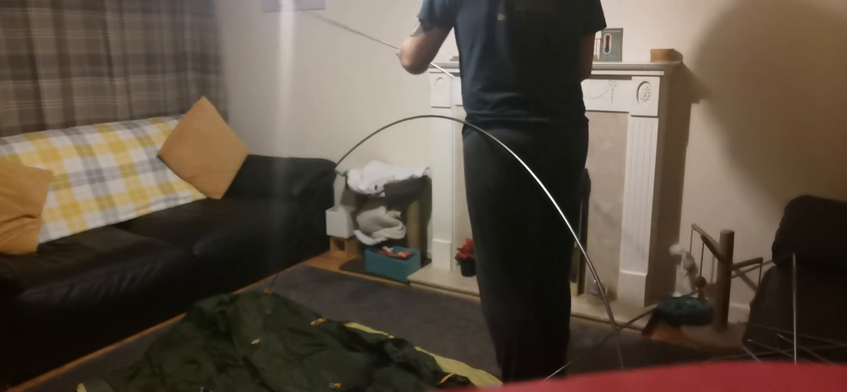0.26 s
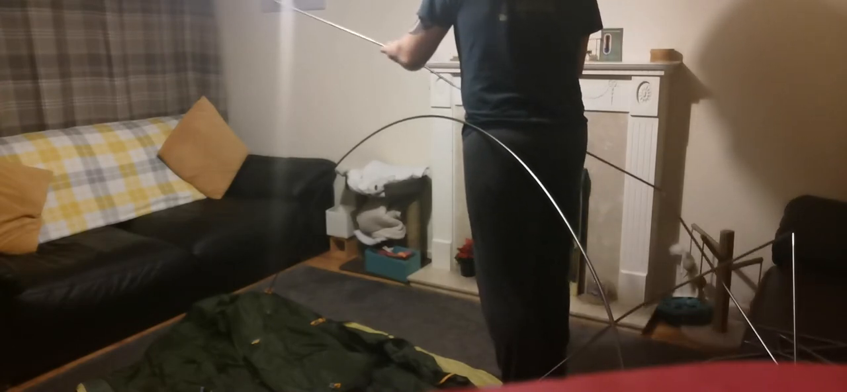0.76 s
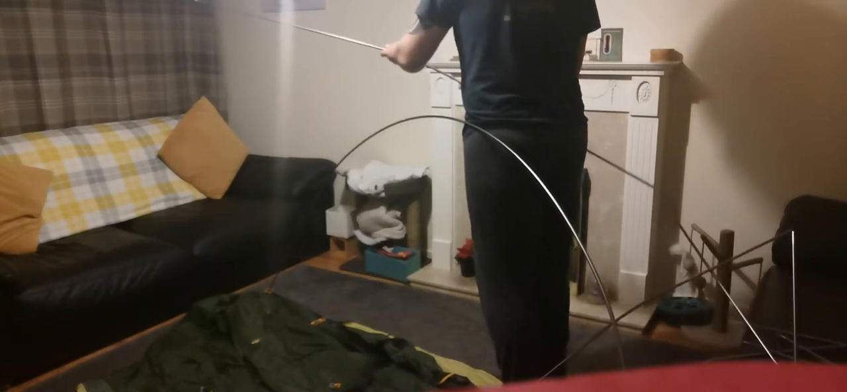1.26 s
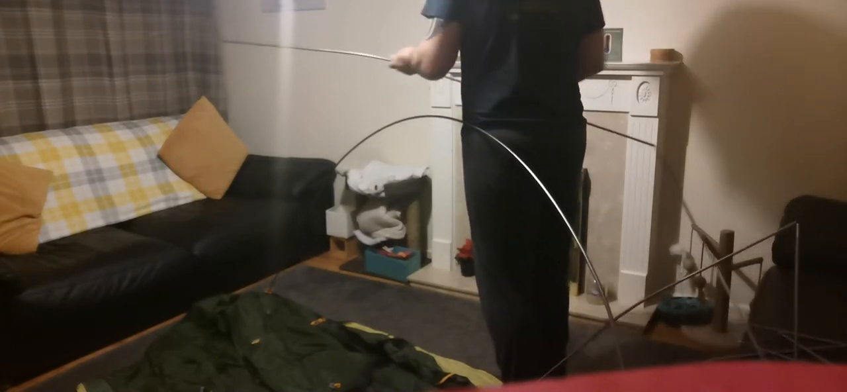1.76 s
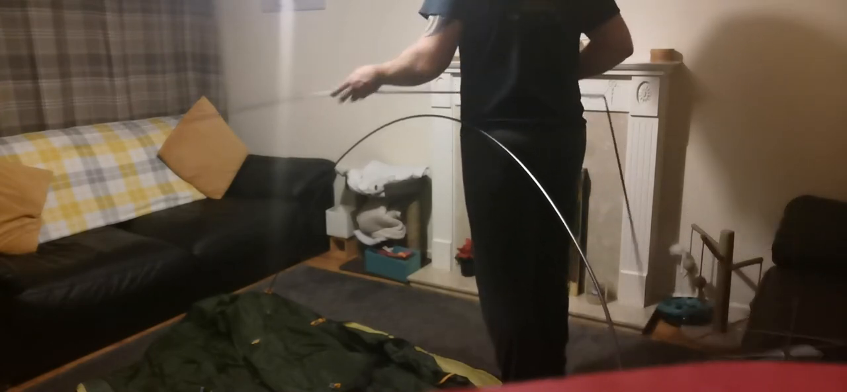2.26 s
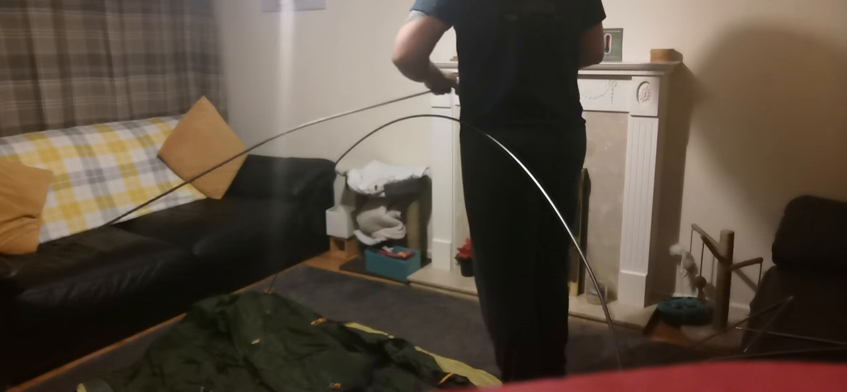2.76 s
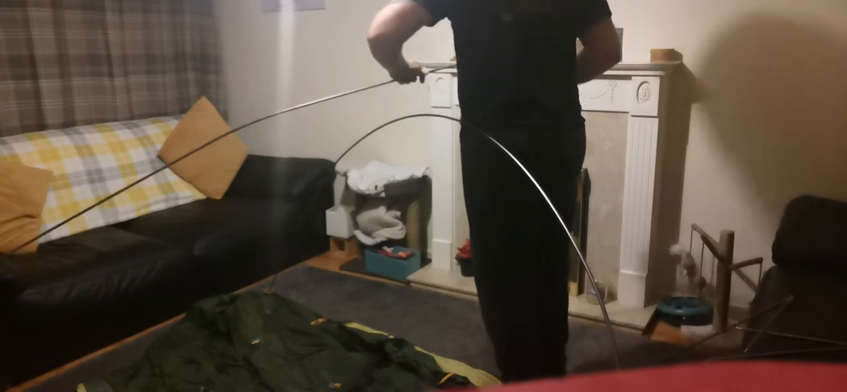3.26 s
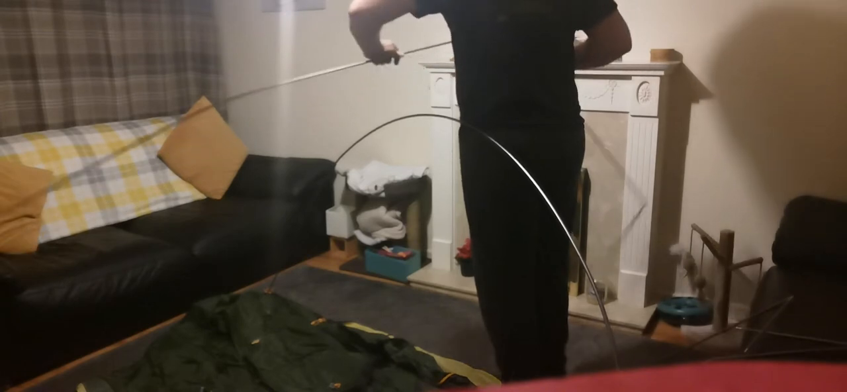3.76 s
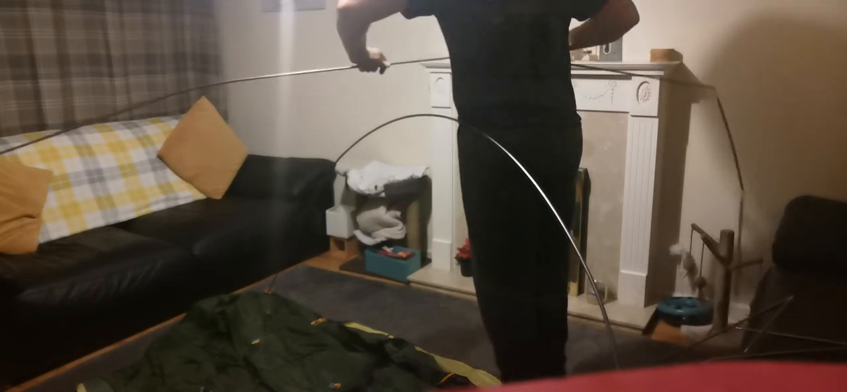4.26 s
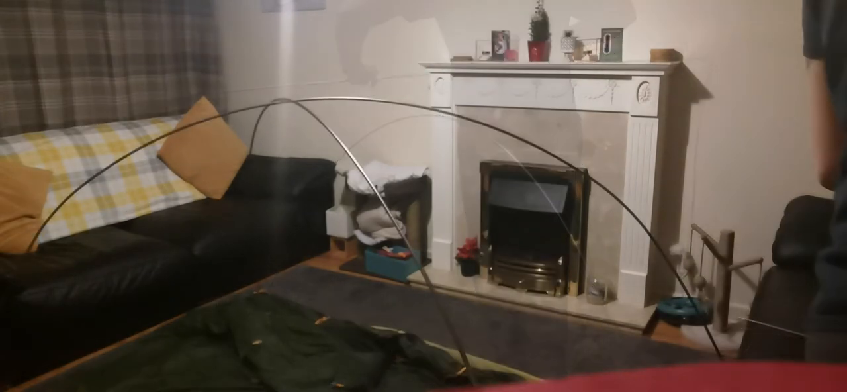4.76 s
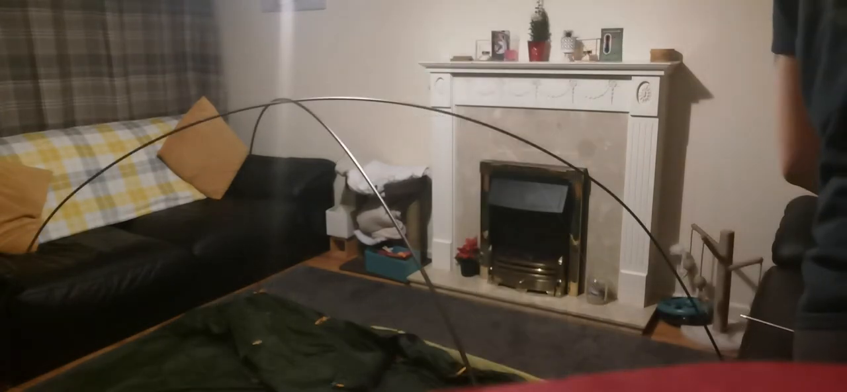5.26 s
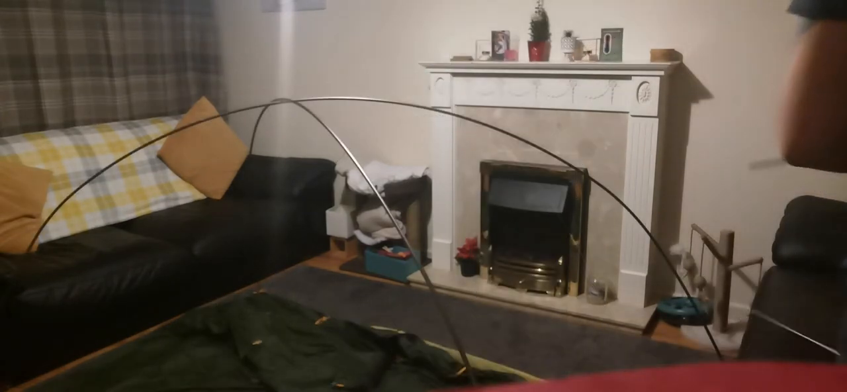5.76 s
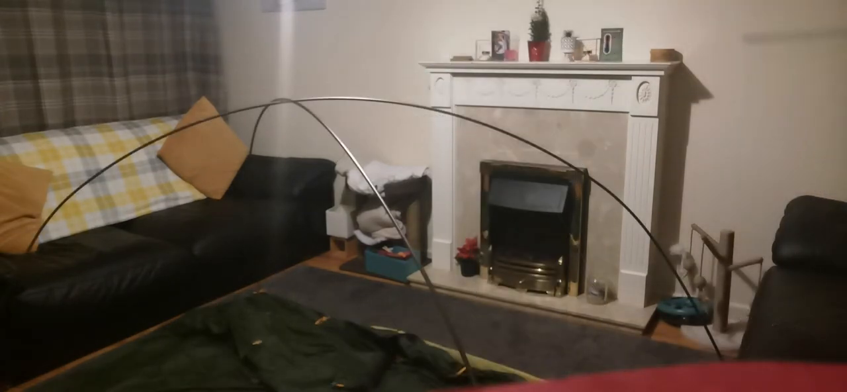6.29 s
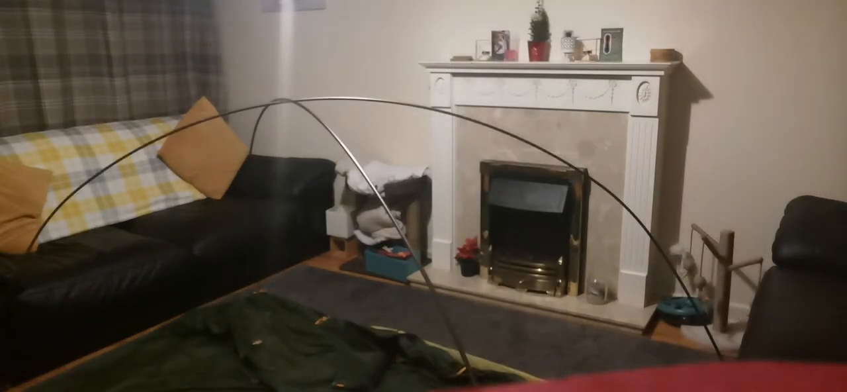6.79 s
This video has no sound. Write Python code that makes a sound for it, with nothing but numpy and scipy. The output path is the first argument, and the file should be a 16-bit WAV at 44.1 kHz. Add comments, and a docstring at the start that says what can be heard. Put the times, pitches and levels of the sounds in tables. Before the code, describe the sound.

In a small living room, thin metal tent pole sections scrape, click and snap together, clattering most densely around two seconds, then near quiet.

```python
"""A small living room: someone unfolds a metal tent pole about two metres from the microphone.
Sections slide in grains of tiny slips and snap home, pulled by the elastic cord, as dispersed cracks with
noise bodies and ringing tube modes; the loose end swings down, scrapes and clatters. Sleeves rustle as
fluttering noise, a foot lands on the carpet as soft noise thuds with a floor boom, and the bare walls
ring briefly as decaying noise. Floor rumble and a faint hiss lie beneath."""
import sys
import numpy as np
from scipy import signal
from scipy.fft import rfft, irfft, next_fast_len
from scipy.io import wavfile
from scipy.ndimage import uniform_filter1d

SR = 44100
rng = np.random.default_rng(int(sys.argv[2]) if len(sys.argv) > 2 else 0)


def int16_out(signal):
    """Quantize to a 16-bit WAV file."""
    q = np.round(np.clip(np.atleast_2d(signal).T, -1, 1) * 32767)
    wavfile.write(sys.argv[1], SR, q.astype(np.int16))


N = 310023
TIME = np.arange(N) / SR

# Colour of the room hiss: (frequency [Hz], level [dB])
HISS_COLOUR = [(25, 18), (70, 14.5), (140, 8.5), (300, 7), (500, 2), (1000, -1.5), (2000, -10.5),
               (4800, -8.5), (7000, -15.5), (9500, -27.5), (13000, -16), (15800, -25)]
# Colour of the floor rumble: (frequency [Hz], level [dB])
RUMBLE_COLOUR = [(10, -7.5), (22, -2.5), (58, -1.5), (110, -9.5), (250, -17), (600, -42), (3000, -66.5)]
# How much the person moves, most while swinging the pole round; drives cloth and rumble:
# (time [s], level [dB])
MOTION = [(0, -4.5), (1.2, -7.5), (2.2, 0.5), (3.1, -5), (4.1, -4), (4.7, -17), (6.0, -11)]
# Colour of rubbing cloth: (frequency [Hz], level [dB])
CLOTH_COLOUR = [(60, 5.5), (250, 1), (600, -2.5), (1200, -5), (3000, -7.5), (6000, -8.5), (10000, -20.5),
                (15800, -27)]
# A sleeve or trouser leg brushing as the person steps aside:
# (time [s], length [s], level [dB], growth from start to end [dB])
BRUSHES = [(5.074, 0.081, -66.5, -6), (5.277, 0.033, -54, 3), (5.552, 0.11, -73.5, 3),
           (6.908, 0.056, -64, -1)]
# Decay of the room: (frequency [Hz], time to fall 60 dB [s])
ROOM_DECAY = [(150, 0.28), (500, 0.4), (1200, 0.39), (3000, 0.34), (7000, 0.32), (13000, 0.29)]
# Pole sliding along pole or through the hand:
# (time [s], length [s], level [dB], growth from start to end [dB], grit [0-1])
STROKES = [(0.005, 0.014, -71, -15, 0.2), (0.154, 0.14, -42.5, 3, 0.2), (0.348, 0.11, -43.5, 0.5, 0.49),
           (0.52, 0.023, -57, -5, 0.55), (1.037, 0.026, -62.5, -1, 0), (1.184, 0.068, -62, 1.5, 0.7),
           (1.332, 0.055, -46.5, 15, 0.5), (1.628, 0.067, -53, -2.5, 0.67), (1.737, 0.14, -65, 21.5, 0.6),
           (1.932, 0.15, -48, 4.5, 0.36), (2.224, 0.12, -35.5, 1.5, 0.7), (2.423, .11, -42.5, 3, 0.6),
           (2.606, 0.025, -38, -10, .1), (2.786, 0.073, -71, 9, 0.3), (3.289, .03, -57, -7, 0.26),
           (3.77, 0.25, -64, 7.5, 0.4), (3.997, 0.043, -45.5, -2, 0.9), (4.061, 0.063, -46.5, 10.5, 0.87),
           (4.257, 0.011, -58, -2, 0.4), (4.531, 0.022, -72.5, -6.5, 0.6), (4.703, 0.011, -59.5, 2, 0.26),
           (5.313, .012, -55, -7, 0.5), (5.55, 0.12, -76.5, -13.5, 0.07)]
# Colour of firm scraping: (frequency [Hz], level [dB])
SCRAPE_COLOUR = [(100, -14), (300, -12), (600, -15.5), (950, -14.5), (1600, -14.5), (2300, -7), (3200, -3),
                 (4600, 4), (6000, -1.5), (7100, 0), (9500, -14), (11000, -15), (13000, -13.5),
                 (15800, -28.5)]
# Colour of light rubbing on top of the scrape colour: (frequency [Hz], level [dB])
GENTLE_COLOUR = [(1500, 11.5), (2400, 1.5), (2950, 9.5), (3500, 1.5), (4900, -2.5), (6500, -3), (11000, -6)]
# Nominal modes of the tubes: (frequency [Hz], level [dB], time to fall 60 dB [s])
TUBE_MODES = [(195, -13, 0.096), (468, -7, 0.25), (862, -3, 0.11), (936, -15, 0.058), (1248, -7.5, 0.08),
              (1660, -11, 0.1), (2250, -9, 0.0427), (3180, -19, 0.074), (3475, -0.5, 0.061),
              (4033, -0.5, 0.024), (4730, 13.5, 0.0099), (5080, -6.5, 0.035), (6550, 5.5, 0.17),
              (6740, -3.5, 0.055), (7710, -11, 0.062), (8500, -6.5, .04), (10560, 4, 0.034),
              (11900, -6.5, .04), (12700, -8, 0.047)]
# Joints snapping home and sections knocking together; the free length of pole sets the bending pitch:
# (time [s], level [dB], body [dB], hollow tone at 2 kHz [dB], treble at 12 kHz [dB],
#  bending mode [Hz], direct sound [dB], left minus right [dB])
SNAPS = [(0.159, -14, -14.5, -15, -8, 900, -7.5, 14), (0.291, -12, -21, -2, -13, 940, -2, 8.5),
         (0.369, -22.5, -1.5, 7, -17, 960, -8, 3.5), (1.386, -1.5, -18, 1, -5, 1225, -2, 0),
         (1.769, -20.5, -13, -1, -15, 950, 0, 0.5), (1.933, -13, -15, -7.5, -19.5, 980, -4, -2.5),
         (2.121, -0.5, -8, -3.5, -2.5, 1011, -4, -1), (2.2, -3, -6, -3, -5.5, 924, -3.5, 1),
         (2.224, -3, -14.5, -5.5, -5, 688, -3, -2.5), (2.245, -8, -5, -5.5, 4.5, 827, -8, 0.5),
         (2.292, -8.5, -4.5, -1.5, 8.5, 393, -3, -1), (2.338, 3, -14, -1, 0, 475, -2.5, 0),
         (2.348, -12, -5, 3.5, -2.5, 876, 2, 1.5), (2.358, -6, -6.5, -0.5, 6.5, 701, 0.5, -2),
         (2.463, -5.5, -7, -12, -3, 890, -2, -2.5), (2.526, -4, -8, -8, -1, 457, -2.5, 0.5),
         (2.549, -10, -8, 6, -2, 750, -6.5, -4), (2.584, -2, -23, -4.5, -6, 980, -1, -1.5),
         (2.606, -1.5, -9.5, 1, -1.5, 537, -2.5, -2), (3.050, -19.5, -10.5, -0.5, -8, 455, -5.5, -2),
         (3.276, -20.5, -29, 1, -3, 920, -9, 9.5), (3.298, -2.5, -11.5, 8, -1.5, 468, -2, 0.5),
         (3.973, -5.5, -10.5, -5, -8, 924, -1.5, 0.5), (3.997, -19.5, -6, 7.5, 7, 179, -9, 3),
         (4.264, -13.5, -26, -17, -6.5, 934, 2.5, -0.5), (4.459, -31, -20, 1, 2.5, 920, -1, 1),
         (4.721, -6.5, -41, 5, -1, 960, 1, 0.5), (6.004, -4.5, -20, 5, -2.5, 248, -3.5, -0.5)]
# Colour of the sharp contact: (frequency [Hz], level [dB])
CRACK_COLOUR = [(400, -36), (1000, -15), (1800, -13.5), (2800, -1.5), (4200, 3.5), (5300, 4.5), (6100, 1),
                (7100, 7), (8300, -0.5), (9800, -7.5), (11000, -2.5), (13000, -7), (15800, -16)]
# Colour of the dull body under each crack: (frequency [Hz], level [dB])
BODY_COLOUR = [(80, -13), (140, -12), (210, 2), (330, -5.5), (560, -4.5), (850, -0.5), (1300, -5.5),
               (2200, -14.5), (5000, -25)]
# Dull bumps on the floor:
# (time [s], level [dB], swell time constant [s], decay time constant [s], upper edge [Hz], floor boom [dB])
BUMPS = [(2.208, -15, 0.011, 0.072, 306, -22), (2.341, -6, 0.0026, 0.024, 200, 4.5),
         (2.402, -10.5, 0.0039, 0.082, 151.4, -12), (2.561, -14.5, .01, 0.12, 357, -8),
         (6.891, -17, 0.021, 0.093, 447, -18), (6.938, -14.5, 0.0087, 0.035, 198, -5.5)]
# Colour of the two microphone ports: (frequency [Hz], level [dB])
LEFT_PORT = [(1200, -2.0), (4500, -2.6), (7000, -4.0), (9000, 2.8), (14000, 1.5)]
RIGHT_PORT = [(1200, -2.9), (4500, -1.4), (7000, 0.6), (9000, -1.0), (14000, -0.44)]

PLACES = 4  # radiating places along the pole
HISS_DB, RUMBLE_DB, CLOTH_DB = -71, -55.5, -63  # rumble and cloth: before the motion curve
STROKE_ATTACK_S, STROKE_RELEASE_S = 0.013, 0.023  # time constants
BRUSH_ATTACK_S, BRUSH_RELEASE_S = 0.04, 0.04  # time constants
BEND_DB = -10  # bending mode at 1 kHz, relative to the body
BEND_DB_PER_OCTAVE = -6.5  # a longer free length bends lower and more strongly
FLOOR_HZ, FLOOR_T60 = 63.6, 0.11  # boom of the floorboards; t60 in seconds
TOP_HZ = 15900


def undb(db):
    """Decibels to gain."""
    return 10 ** (np.asarray(db) / 20)


def unit(x):
    """Scale to an energy of one."""
    return x / np.sqrt(np.sum(x ** 2))


def level(x, db):
    """Scale to an rms level in dB."""
    return x * undb(db) / np.sqrt(np.mean(x ** 2))


def motion():
    """Level of the person's movement over time in dB, joined by straight lines."""
    s, db = np.transpose(MOTION)
    return np.interp(TIME, s, db)


def colour(x, points):
    """Minimum-phase filter with the given (frequency [Hz], level [dB]) outline."""
    size = 8192
    hz, db = np.transpose(points)
    log_hz = np.log(np.arange(size // 2 + 1) * SR / size + 1)
    gain = undb(np.interp(log_hz, np.log(hz), db))
    # Folding the cepstrum forward makes the response causal.
    cepstrum = irfft(np.log(gain))
    cepstrum[1:size // 2] *= 2
    cepstrum[size // 2 + 1:] = 0
    response = irfft(np.exp(rfft(cepstrum)))
    if x.ndim > 1:
        response = response[None]
    return signal.oaconvolve(x, response, axes=-1)[..., :x.shape[-1]]


def add(track, s, sound):
    """Mix a sound into a track from time s on."""
    i = int(s * SR)
    track[..., i:i + sound.shape[-1]] += sound[..., :N - i]


def walk(rate):
    """Smooth random wander with a spread near one; rate is in new values per second."""
    steps = rng.standard_normal(2048)
    return np.interp(TIME * rate, np.arange(len(steps)), steps)


def ports(size, alike_hz, most=1):
    """Diffuse noise at two microphone ports: most alike in the bass, unrelated in the treble."""
    mid, side = rfft(rng.standard_normal((2, size)))
    hz = np.arange(len(mid)) * SR / size
    alike = most / (1 + (hz / alike_hz) ** 2)
    shared = mid * np.sqrt(1 + alike)
    opposed = np.array([[1], [-1]]) * side * np.sqrt(1 - alike)
    return irfft(shared + opposed, size)


def hush():
    """The faint hiss of the room: diffuse noise that wavers very slightly."""
    air = ports(next_fast_len(N, real=True), 300)[:, :N]
    waver_db = 0.7 * walk(3.29)
    return level(colour(air, HISS_COLOUR), HISS_DB) * undb(waver_db)


def rumble(alike=0.31):
    """Low rumble of the floor as weight shifts: bass noise partly shared by the two ports."""
    noise = ports(next_fast_len(N, real=True), 130, alike)[:, :N]
    return level(colour(noise, RUMBLE_COLOUR), RUMBLE_DB) * undb(motion())


def stroke(s, length, db, growth_db, attack_s, release_s):
    """Gain of one rubbing movement: it sets in, holds while growing or easing, and dies away."""
    t = TIME - s
    held = np.clip(t, 0, length)
    edges = np.minimum(t, 0) / attack_s - np.maximum(t - length, 0) / release_s
    swell = undb(db + growth_db * (held / length - 0.5))
    return swell * np.exp(np.maximum(edges, -20))  # the floor keeps later logarithms finite


def rustle(flutter_db=3):
    """Cloth folds rub unevenly as the person moves, and louder in a few brushes."""
    brushes = sum(stroke(*row, BRUSH_ATTACK_S, BRUSH_RELEASE_S) for row in BRUSHES)
    gain = undb(CLOTH_DB + motion()) + brushes
    rubbing = rng.standard_normal(N) * undb(flutter_db * walk(70))
    return level(colour(rubbing, CLOTH_COLOUR), 0) * gain


def room(x, build_s=0.0028, alike_hz=240):
    """Diffuse ring of the room from one place: noise dying at its own speed in each band."""
    t = TIME[:SR // 2]
    noise = rfft(ports(len(t), alike_hz))
    band_hz, t60 = np.transpose(ROOM_DECAY)
    log_hz = np.log(np.linspace(1, SR / 2, noise.shape[-1]))
    tail = 0
    for share, decay in zip(np.eye(len(t60)), t60):
        band = irfft(noise * np.interp(log_hz, np.log(band_hz), share))
        tail = tail + band * np.exp(-np.log(1000) * t / decay)
    tail = tail * (1 - np.exp(-t / build_s))
    return signal.oaconvolve(x, np.sqrt(2) * unit(tail), axes=-1)[:, :N]


def contact(size, travel_s, return_s, bounce=0.38):
    """A sharp contact runs along the pole, treble first, and keeps returning from the joints."""
    hz = np.arange(size // 2 + 1) * SR / size
    # Bending waves: delay falls with the root of frequency; the given times hold at 4 kHz.
    turn = -4j * np.pi * np.sqrt(4000 * hz)
    arrival = np.exp(turn * travel_s)
    returns = 1 - bounce * np.exp(turn * return_s)
    return unit(irfft(arrival / returns, size))


def ring(t, hz, t60):
    """One decaying mode of unit energy, starting at a random phase."""
    wave = np.sin(2 * np.pi * hz * t + rng.uniform(0, 2 * np.pi))
    return unit(wave * np.exp(-np.log(1000) * t / t60))


def tube(t, low_db, detune=0.0051, scatter_db=2):
    """Ring of one section: each differs a little, and hard light contacts barely move the low modes."""
    total = 0
    for hz, db, t60 in TUBE_MODES:
        gain = undb(db + scatter_db * rng.normal() + low_db / (1 + (hz / 1500) ** 4))
        total = total + gain * ring(t, hz * (1 + detune * rng.normal()), t60)
    return unit(total)


def slides(grain_rate=700, grit_db=6, return_s=0.0022, tube_db=-11, jerk_db=2, shift_db=3, firm_db=-50):
    """Sliding metal catches in tiny slips (grain_rate per second); grit roughens, firmness brightens."""
    gains = np.array([stroke(*row[:-1], STROKE_ATTACK_S, STROKE_RELEASE_S) for row in STROKES])
    total = gains.sum(axis=0)
    db = 20 * np.log10(total)
    grit = np.array(STROKES)[:, -1] @ gains / total
    firm = 0.5 + 0.5 * np.tanh((db - firm_db) / 6)
    force = undb(db + jerk_db * walk(60)) / np.sqrt(PLACES)
    out = []
    for _ in range(PLACES):
        at = np.flatnonzero(rng.random(N) < grain_rate / SR)
        signs = rng.choice([-1, 1], N)[at]
        sizes = np.minimum(rng.exponential(size=N)[at], 5)
        slips = np.zeros(N)
        slips[at] = signs * undb(grit_db * grit[at] * sizes)
        # Even out the local power, then let force and a drifting share per place set the level.
        local_rms = np.sqrt(uniform_filter1d(slips ** 2, SR // 20) + 1e-9)
        slips *= force * undb(shift_db * walk(12)) / local_rms
        slips = firm * slips + colour((1 - firm) * slips, GENTLE_COLOUR)
        kick = contact(SR // 8, 0, return_s * rng.uniform(0.6, 1.4))
        kick = unit(colour(kick, SCRAPE_COLOUR))
        ringing = undb(tube_db) * tube(TIME[:SR // 8], -6)
        out.append(signal.oaconvolve(slips, kick + ringing)[:N])
    return np.array(out)


def near(x, echo_db=-4, echo_s=0.0043):
    """The straight path and a bounce off the nearest wall; each reaches the two ports with its own lag."""
    straight, bounce = rng.integers(0, 20, (2, 2))  # lags in samples
    late = int(echo_s * SR * rng.uniform(0.8, 1.5))
    sides = [np.roll(side, a) + undb(echo_db) * np.roll(side, late + b)
             for side, a, b in zip(x, straight, bounce)]
    return np.array(sides) / np.hypot(1, undb(echo_db))


def snaps(chatter_s=0.008, travel_s=0.0033, return_s=0.0029, uneven_db=-0.46, tube_db=-14,
          bend_t60=0.087, body_s=0.011):
    """Each snap is a quick chatter from several places on the pole; returns room feed and direct sound."""
    spread, direct = np.zeros((2, PLACES, 2, N))
    t = TIME[:SR // 8]
    for s, db, body_db, hollow_db, treble_db, bend_hz, direct_db, pan_db in SNAPS:
        bend_db = body_db + BEND_DB + BEND_DB_PER_OCTAVE * np.log2(bend_hz / 1000)
        ringing = undb(tube_db) * tube(t, body_db + 16.5)
        ringing = ringing + undb(bend_db) * ring(t, bend_hz, bend_t60)
        pan = np.array([[pan_db], [-pan_db]]) / 2
        gain = undb(db + pan) / np.sqrt(PLACES)
        section_s = return_s * rng.uniform(0.7, 1.3)
        cracks = np.array([contact(len(t), travel_s * rng.uniform(0.6, 1.2), section_s)
                           for _ in range(PLACES)])
        cracks = colour(cracks, CRACK_COLOUR)
        bodies = colour(rng.standard_normal((PLACES, len(t))) * np.exp(-t / body_s), BODY_COLOUR)
        sounds = np.sqrt(PLACES) * (unit(cracks) + undb(body_db) * unit(bodies)) + ringing
        sounds = colour(sounds, [(900, 0.0048), (2000, hollow_db), (4500, 0.012), (12000, treble_db)])
        for turn, place in enumerate(rng.permutation(PLACES)):
            when = s + chatter_s * (turn + rng.uniform(-0.45, 0.15)) / PLACES
            # No two contacts are equally hard.
            sound = sounds[turn] * gain * undb(uneven_db * rng.normal())
            add(spread[place], when, sound)
            # The person's body hides some joints from the microphone.
            add(direct[place], when, sound * undb(direct_db))
    return spread, direct


def bumps():
    """Soft blows on the carpet: swelling noise thuds; the heavy ones make the floorboards boom."""
    out = np.zeros(N)
    t = TIME[:SR * 3 // 4]
    boom = unit(np.sin(2 * np.pi * FLOOR_HZ * t) * np.exp(-np.log(1000) * t / FLOOR_T60))
    for s, db, swell, length, edge_hz, boom_db in BUMPS:
        push = rng.standard_normal(len(t)) * (1 - np.exp(-t / swell)) * np.exp(-t / length)
        outline = [(20, -6), (58, 0), (edge_hz, -10), (edge_hz * 4, -32), (12000, -80)]
        thud = unit(colour(push, outline))
        add(out, s, undb(db) * (thud + undb(boom_db) * boom))
    return out


def scene(rub_direct_db=-7, bump_room_db=-9, bump_direct_db=-1):
    """Every place along the pole stirs the room in its own way; bumps also come straight along the floor."""
    spread, direct = snaps()
    floor = bumps()
    pole = 0
    for feed, straight, rub in zip(spread, direct, slides()):
        pole = pole + room(feed + rub) + near(straight + undb(rub_direct_db) * rub)
    person = room(np.tile(rustle() + undb(bump_room_db) * floor, (2, 1)))
    return pole + person + undb(bump_direct_db) * floor + rumble() + hush()


def record(dry):
    """The two microphone ports differ in colour; the top is cut steeply."""
    both = np.array([colour(dry[0], LEFT_PORT), colour(dry[1], RIGHT_PORT)])
    top_cut = signal.ellip(10, 0.2, 70, TOP_HZ, fs=SR, output="sos")
    return signal.sosfilt(top_cut, both)


dry = scene()
out = record(dry)
int16_out(out)
```